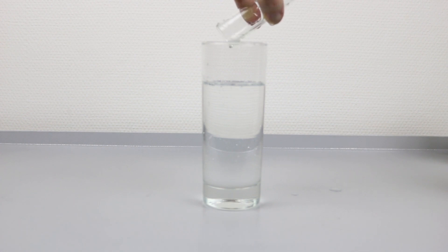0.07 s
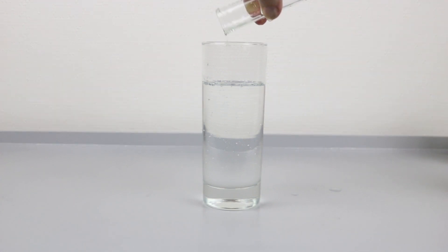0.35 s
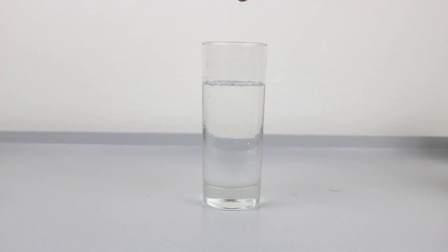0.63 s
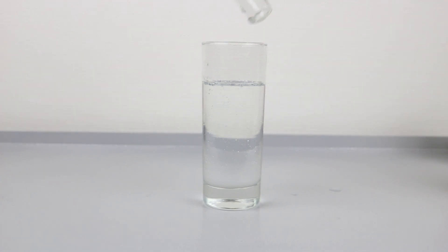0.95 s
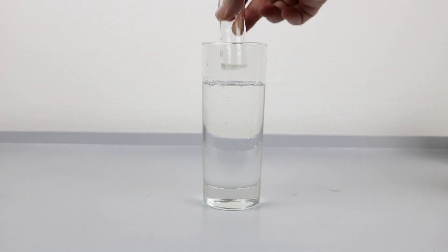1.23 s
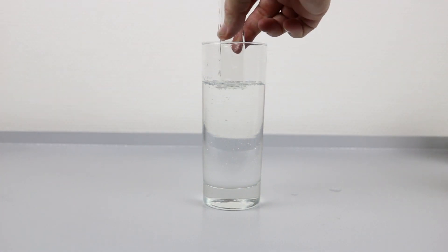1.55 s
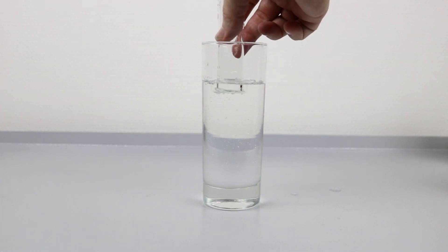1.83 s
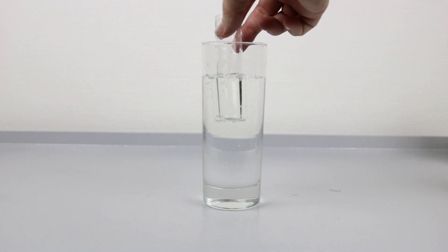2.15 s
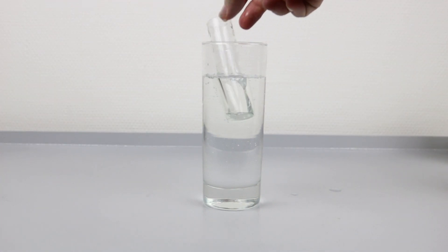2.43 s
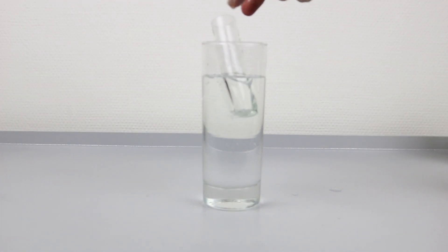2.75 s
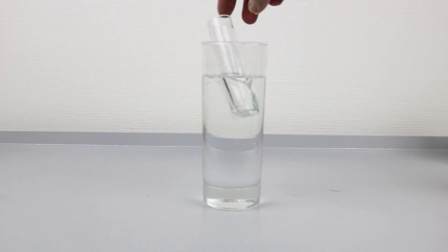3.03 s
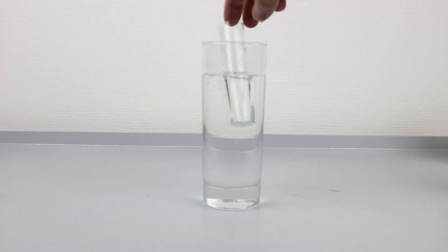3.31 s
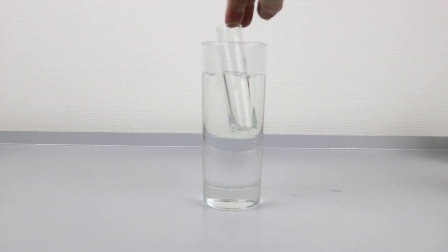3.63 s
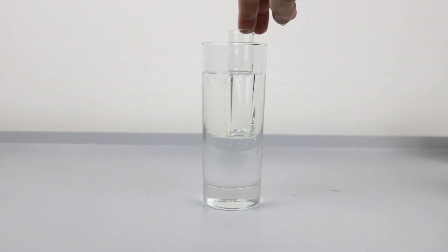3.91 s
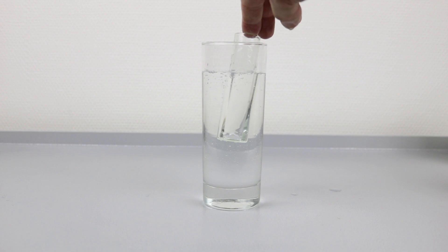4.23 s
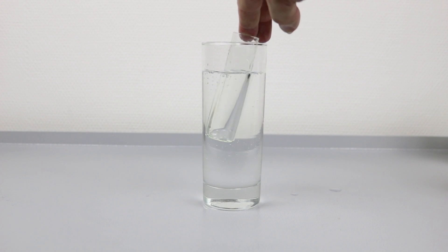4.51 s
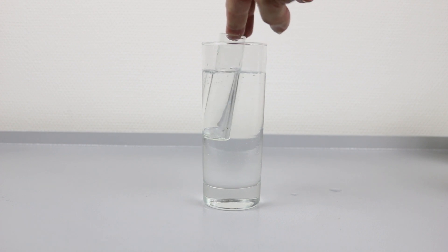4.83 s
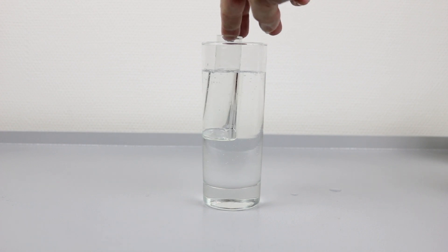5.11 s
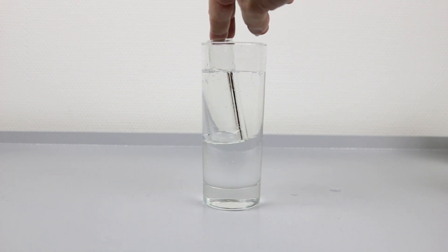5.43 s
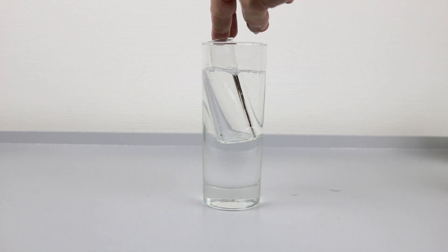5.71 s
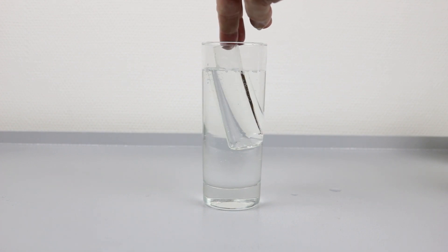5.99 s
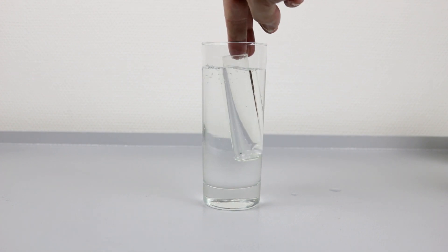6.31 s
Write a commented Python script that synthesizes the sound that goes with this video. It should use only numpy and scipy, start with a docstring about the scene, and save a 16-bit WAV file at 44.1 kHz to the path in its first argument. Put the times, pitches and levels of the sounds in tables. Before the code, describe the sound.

In a small, quiet room with a faint low hum, a glass tube strikes the rim of a tumbler of water with a sharp, ringing clink and a tiny rebound, and the table booms softly. Two softer, shorter, lower clinks follow against the wall of the glass, with faint dull underwater knocks between them. A camera's focus motor ticks very faintly near the microphone.

```python
"""A glass tube, lowered into a tumbler of water in a small room, falls against the rim and rebounds,
then is pushed down and touches the wall twice more. Each impact excites the normal modes of both
glasses; the rising water loads the tumbler and lowers its note. The tube knocks dully under water,
and firm blows make the table boom. Behind it are room air, the low hum of a distant engine, the faint
steps of a camera's focus motor and soft handling noise."""
import sys
import numpy as np
from scipy import signal
from scipy.fft import rfft, irfft
from scipy.io import wavfile
from scipy.ndimage import uniform_filter1d

SR = 44100
rng = np.random.default_rng(int(sys.argv[2]) if len(sys.argv) > 2 else 0)


def store_pcm(level_fs):
    """Save levels as 16-bit WAV."""
    pcm = np.round(np.clip(level_fs, -1, 1) * 32767).astype(np.int16)
    wavfile.write(sys.argv[1], SR, np.atleast_2d(pcm).T)


N = 284610


def amp(db):
    return 10 ** (np.asarray(db) / 20)


def unit_rms(x):
    return x / np.sqrt(np.mean(x ** 2) + 1e-20)


def value_at(points, hz):
    """Interpolates a spectrum on a logarithmic frequency axis."""
    f, value = np.transpose(points)
    return np.interp(np.log(hz + 1), np.log(f + 1), value)


def add(mix, start_s, sound):
    """Superposition: a sound sums into the stereo mix from start_s on."""
    part = mix[:, max(round(start_s * SR), 0):][:, :sound.shape[-1]]
    part += sound[..., :part.shape[1]]


def coloured(x, points):
    """Linear filtering: multiplies the spectrum of x by a curve given in dB."""
    n = x.shape[-1]
    return irfft(rfft(x) * amp(value_at(points, np.fft.rfftfreq(n, 1 / SR))), n)


def decay(t, t60):
    """Exponential damping: the level falls 60 dB in t60 seconds."""
    return np.exp(-np.log(1000) * t / t60)


def mode(t, hz, t60, phase=0):
    """Free vibration of a damped oscillator."""
    return np.sin(2 * np.pi * hz * t + phase) * decay(t, t60)


def air(level_db=-59):
    """Partial coherence: steady room noise is alike at left and right in the bass, not in the treble."""
    # Each row: frequency in Hz, relative spectral density in dB.
    spectrum = [(20, -25.5), (32, -8), (42, -9), (49, 2), (58, -11.5), (90, -9.5), (120, -12.5),
                (170, -12.5), (248, -8), (290, -15.5), (500, -18), (760, -21.5), (2500, -28), (8650, -34.5),
                (14300, -41), (16000, -45)]
    # Each row: frequency in Hz, left-right correlation.
    correlation = [(60, 0.94), (130, 0.67), (290, .75), (640, 0.094), (1410, 0.032), (3100, -0.0),
                   (6820, 0), (15000, 0.085)]
    hz = np.fft.rfftfreq(N, 1 / SR)
    left, independent = rfft(rng.standard_normal((2, N)))
    alike = value_at(correlation, hz)
    right = alike * left + np.sqrt(1 - alike ** 2) * independent
    pair = irfft(np.array([left, right]) * amp(value_at(spectrum, hz)) / np.sqrt(1 + alike), N)
    return amp(level_db) * pair / pair.mean(0).std()


def engine(coasting_db=-76, pulling_db=-64.5, full_load_hz_per_s=12.4, load_smoothing_s=1.31):
    """Harmonics of the firing rate: the lowest pass the walls; overtones swell with load and resonance."""
    # The engine coasts, then pulls away. Each row: time in seconds, firing rate in Hz.
    speed = [(0, 79.7), (.6, 76.23), (1.25, 89.07), (2.45, 79.93), (3.95, 65), (4.4, 74.86), (4.7, 78.96),
             (5.2, 81.75), (5.75, 90.64), (6.45, 102.3)]
    # Each row: time in seconds, level of the fundamental in dB.
    hum_level = [(0.0, -70), (0.21, -52), (0.3, -62.5), (0.92, -69.5), (1.06, -55.5), (1.9, -75),
                 (2.66, -47), (2.82, -63), (2.86, -58.5), (3.65, -71.5), (4.47, -77), (4.67, -54),
                 (5.21, -51), (5.34, -60), (5.39, -54), (5.64, -59), (5.71, -49), (6.45, -53.5)]
    # Each row: harmonic number, relative level in dB.
    overtones = [(2, 0.5), (3, -0.5), (4, -9.5)]
    # Each row: frequency in Hz, the room's gain on the overtones in dB.
    room_gain = [(130, -0.5), (160, 0), (200, -6), (245, -9), (280, -3.5), (300, 10), (325, 4), (420, 1)]
    t = np.arange(N) / SR
    knots = np.linspace(0, t[-1], 90)

    def drift():
        return np.interp(t, knots, rng.standard_normal(len(knots)))

    hz = np.interp(t, *np.transpose(speed))
    acceleration = uniform_filter1d(np.gradient(hz) * SR, int(load_smoothing_s * SR))
    load = np.clip(acceleration / full_load_hz_per_s, 0, 1)
    overtone_db = coasting_db + (pulling_db - coasting_db) * load
    phase = 2 * np.pi * np.cumsum(hz) / SR
    hum_db = np.interp(t, *np.transpose(hum_level)) + 1.5 * drift()
    out = amp(hum_db) * np.sin(phase)
    for k, db in overtones:
        level = amp(overtone_db + db + value_at(room_gain, k * hz))
        flutter = 1 + 0.32 * drift()
        out += level * flutter * np.sin(k * phase + 2 * np.pi * rng.random())
    return np.sqrt(2) * out


def focus_motor(whirr_s=0.0093, from_hz=360, to_hz=800, whirr_db=-54.5, vary_db=2.2):
    """Transient excitation: each motor step is a tiny accelerating whirr that rings the lens barrel."""
    # Spans in which the motor hunts. Each row: first step and end, in seconds.
    hunting = [(.1175, .3), (.8375, 3.85), (4.3175, 6.42)]
    # Each row: frequency in Hz, t60 in seconds, level in dB.
    barrel_modes = [(904, 0.058, -62.5), (1470, 0.0064, -56)]
    out, t = np.zeros((2, N)), np.arange(SR // 10) / SR
    progress = np.minimum(t / whirr_s, 1)
    phase = 2 * np.pi * np.cumsum(from_hz + (to_hz - from_hz) * progress) / SR
    tick = amp(whirr_db) * np.sin(np.pi * progress) * np.sin(phase)
    tick += sum(amp(db) * mode(t, hz, t60) for hz, t60, db in barrel_modes)
    step_s, group_s = 0.08, 0.36
    groups = group_s * np.arange(9)[:, None] + step_s * np.arange(4)
    pattern = groups.ravel()[1:] - step_s  # three steps, then groups of four
    for first, end in hunting:
        for start in first + pattern[first + pattern < end]:
            add(out, start, amp(vary_db * rng.standard_normal()) * tick)
    return out


def handling():
    """Band-limited noise: the moving hand and tube make soft rumbles and a faint rustle."""
    # Each row: centre and length in seconds, level at the crest in dB, lower and upper edge in Hz.
    swells = [(0.95, 1, -71, 1320, 1570), (1.14, 0.28, -53, 66, 111), (1.08, 0.25, -63, 150, 390),
              (2.24, 0.46, -52, 30.1, 54)]
    out = np.zeros((2, N))
    for centre, length, db, *band_hz in swells:
        bandpass = signal.butter(2, band_hz, "bandpass", fs=SR, output="sos")
        noise = signal.sosfilt(bandpass, rng.standard_normal(SR))
        swell = np.hanning(int(length * SR))
        add(out, centre - length / 2, amp(db) * unit_rms(noise[:len(swell)]) * swell)
    return out


def tube(t, place, spread_rad=0.097, crack_t60=0.023, rise_s=0.00028):
    """A hard impact is broadband: a sharp crack and bright, quickly damped modes of tube and contact."""
    # Each row: frequency in Hz, t60 in seconds, levels in dB for contact places 0, 1 and 2.
    modes = [(726, 0.025, -39, -44, -46), (1803, 0.047, -25, -53, -31.5), (1953, 0.023, -22.5, -58, -29.5),
             (2220, 0.0087, -11, -40, -37), (2410, 0.019, -22.5, -36, -40.5),
             (2676, 0.035, -24.5, -36, -44.5), (3020, 0.012, -9.5, -39, -52),
             (3453, 0.00895, -20.5, -30, -54), (4294, 0.021, -31.5, -49, -35.5),
             (4544, 0.047, -24.5, -45, -60), (5452, 0.026, -11, -39, -36.5), (5610, 0.037, -11.5, -63, -55),
             (5655, 0.016, -15, -43, -60), (6965, .016, -30.5, -32.5, -31.5),
             (7080, 0.035, -13.5, -56, -40), (7580, .013, -15.5, -37, -30), (7870, 0.023, -19, -51, -37),
             (8160, 0.016, -30.5, -57, -35), (8720, 0.014, -17, -68, -49), (9280, 0.01604, -22, -62, -48),
             (10000, 0.013, -24.5, -58, -42), (12500, 0.0067, -29, -66, -37),
             (12940, 0.0089, -31, -70, -49), (14360, .01, -31, -76, -51), (15050, .02, -30, -78, -47)]
    # Level of the contact noise in dB for places 0, 1 and 2.
    crack_db = [-17, -39.5, -34.5]
    # Each row: frequency in Hz, relative level in dB.
    crack_spectrum = [(100, -18.5), (400, -9), (1000, -9), (2500, 0), (8000, -4), (11000, -7.5),
                      (16000, -13.5)]
    phases = spread_rad * rng.standard_normal((len(modes), 2, 1))  # separate for left and right
    ring = sum((-1) ** k * amp(db[place]) * mode(t, hz, t60, phases[k])
               for k, (hz, t60, *db) in enumerate(modes))
    noise = unit_rms(coloured(rng.standard_normal((2, len(t))), crack_spectrum))
    return ring * (1 - np.exp(-t / rise_s)) + amp(crack_db[place]) * noise * decay(t, crack_t60)


def tumbler(t, place, water, split_hz=1.9, twin_gain=0.55, settle_s=0.097, settled_t60=0.059):
    """Mass loading: water lowers the wall's beating mode pairs. Returns direct sound and room feed."""
    # Each row: frequency in Hz, t60 and rise in seconds, share of frequency lost at full water rise,
    # gain into the room in dB, levels in dB for contact places 0, 1 and 2.
    wall_modes = [(1280, 0.5, 0.012, .0585, -12, -21.5, -40, -35),
                  (3715, 0.19, 0.0017, 0.13, 5, -31, -57.5, -43),
                  (3764, 0.13, 0.00065, 0.037, 1, -30.5, -63, -63),
                  (5500, 0.15, .001, .146, 4, -38, -58, -44.5),
                  (7025, 0.14, .001, .121, -4.5, -35, -59, -47),
                  (10880, .13, .001, 0.155, 0.5, -38, -69, -49)]
    direct, to_room = np.zeros((2, len(t)))
    choke = decay(np.maximum(t - settle_s, 0), settled_t60)  # the tube comes to rest on the wall
    for hz, t60, rise_s, sag, room_db, *db in wall_modes:
        hz *= 1 - sag * water
        if place:
            t60 *= 0.28  # held against the wall, the tube shortens the ring
        pair = (mode(t, hz, t60) + twin_gain * mode(t, hz + split_hz, t60)) / (1 + twin_gain)
        ring = amp(db[place]) * pair * choke * (1 - np.exp(-t / rise_s))
        direct += ring
        to_room += amp(room_db) * ring
    return direct * amp([[0.5], [-0.5]]), to_room  # slightly to the left


def clinks():
    """Modal excitation: each impact rings both glasses; the contact point sets each mode's strength."""
    # Each row: start in seconds, strength in dB, contact place (0 the rim, 1 and 2 the wall),
    # water rise from 0 to 1, further gain on the tumbler's ring in dB.
    impacts = [(2.4792, 1, 0, 0, 4), (2.538, -14.5, 0, 0, -24), (2.5553, -20, 0, 0.1, -24),
               (4.502, -4.5, 1, 0.92, 9.5), (4.5128, -11.5, 1, .72, -28), (4.665, -26, 1, 0.75, 3),
               (5.4304, -0.5, 2, 0.99, 4), (5.4378, -5.5, 2, 0.7, -28)]
    direct, to_room = np.zeros((2, 2, N))
    t = np.arange(0, 0.7, 1 / SR)
    for start, db, place, water, ring_db in impacts:
        clack = tube(t, place)
        ring, ring_to_room = tumbler(t, place, water)
        add(direct, start, amp(db) * (clack + amp(ring_db) * ring))
        add(to_room, start, amp(db) * (clack + amp(ring_db) * ring_to_room))
    return direct + room(to_room)


def room(x, tail_db=-3, build_s=0.0024):
    """Reverberation: a few early reflections and a diffuse tail whose treble dies first."""
    # Each row: frequency in Hz, reverberation time in seconds.
    decay_times = [(200, 1), (700, 0.67), (1700, 0.44), (4500, 0.55), (8000, 0.49), (12000, 0.31),
                   (16000, .25)]
    # Each row: frequency in Hz, gain on the tail in dB.
    colour = [(200, 0.5), (800, 5), (1280, 10), (1800, 0.5), (3600, -2), (5500, -5), (7500, -8),
              (11000, 0.5), (16000, -8)]
    # From the table and near walls. Each row: delay in seconds, left and right gain in dB.
    reflections = [(.0012, -20, -19.5), (.0052, -16.5, -20.5), (0.0132, -16.5, -32.5), (0.0191, -22, -20)]
    hz, t, noise = signal.stft(rng.standard_normal((2, SR)), SR, nperseg=256)
    _, tail = signal.istft(noise * decay(t, value_at(decay_times, hz)[:, None]), SR, nperseg=256)
    tail *= 1 - np.exp(-np.arange(tail.shape[1]) / SR / build_s)
    response = amp(tail_db) * coloured(tail / np.linalg.norm(tail[0]), colour)
    for delay, left_db, right_db in reflections:
        response[:, round(delay * SR)] += amp([left_db, right_db])
    return signal.fftconvolve(x, response[:, :int(0.8 * SR)], axes=1)[:, :N]


def table_thumps(rise_s=0.015):
    """Structure-borne sound: firm blows pass through the tumbler's foot and ring the table's low modes."""
    # Each row: start in seconds, strength in dB.
    blows = [(2.482, 8.5), (5.342, -15), (5.432, -5)]
    # Each row: frequency in Hz, t60 in seconds, level in dB.
    modes = [(115.7, .6, -57), (137, .5, -54.5), (214, .7, -58.5), (299, 0.62, -60.5), (340.4, .4, -55.5),
             (494, .4, -60)]
    out, t = np.zeros((2, N)), np.arange(SR) / SR
    boom = sum(amp(db) * mode(t, hz, t60) for hz, t60, db in modes) * (1 - np.exp(-t / rise_s))
    for start, db in blows:
        add(out, start, amp(db) * boom)
    return out


def underwater_knocks():
    """Heavy damping: contacts of the tube that are cushioned by water sound dull and die quickly."""
    # Each row: start in seconds, level in dB, frequency in Hz, t60 in seconds.
    knocks = [(4.178, -54.5, 1708, 0.022), (5.2188, -42, 1370, .012), (5.224, -41, 1160, 0.015),
              (5.234, -46.5, 1130, 0.033), (5.342, -36.5, 610, 0.0062), (5.341, -46.5, 2170, 0.018),
              (5.3456, -53, 2200, 0.0088)]
    out, t = np.zeros((2, N)), np.arange(SR // 10) / SR
    for start, db, hz, t60 in knocks:
        add(out, start, amp(db) * mode(t, hz, t60))
    return out


def scene():
    """Superposition of the two glasses, their table and the background."""
    return clinks() + underwater_knocks() + table_thumps() + focus_motor() + engine() + handling() + air()


def record(dry, ceiling=0.65, cutoff_hz=15800):
    """Soft saturation rounds the hardest clink; a low-pass filter then limits the band."""
    saturated = dry / (1 + (dry / ceiling) ** 4) ** (1 / 4)
    lowpass = signal.firwin(511, cutoff_hz, window=("kaiser", 9), fs=SR)
    return signal.oaconvolve(saturated, lowpass[None], "same")


dry = scene()
out = record(dry)
store_pcm(out)
```